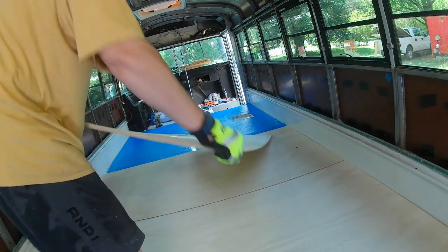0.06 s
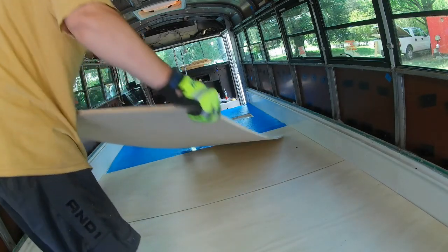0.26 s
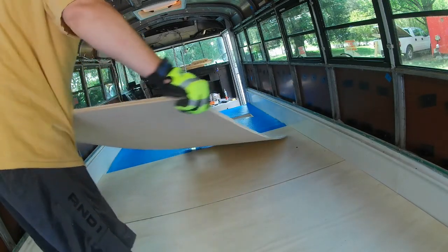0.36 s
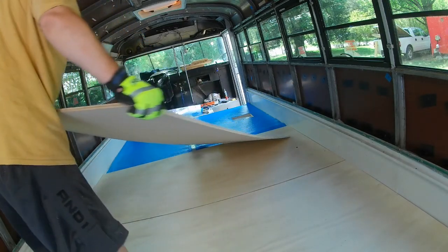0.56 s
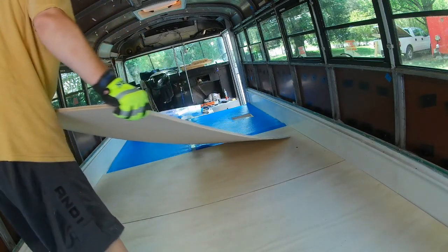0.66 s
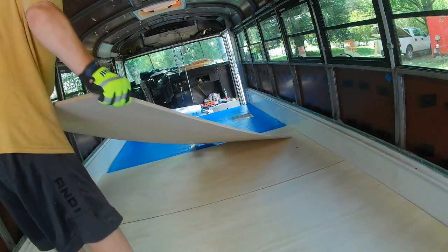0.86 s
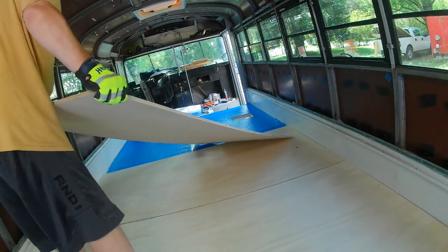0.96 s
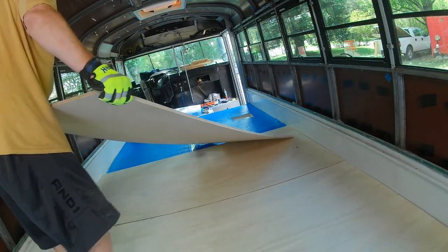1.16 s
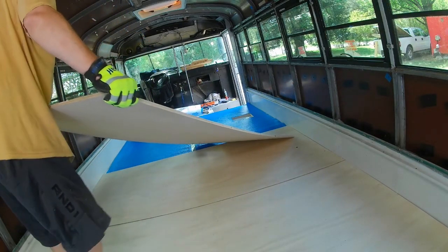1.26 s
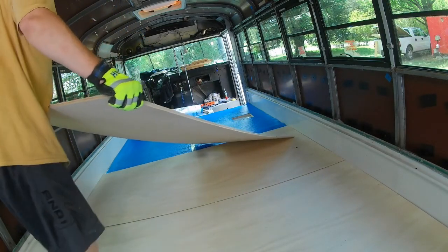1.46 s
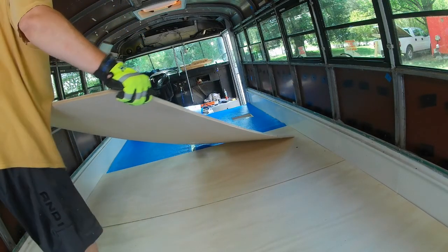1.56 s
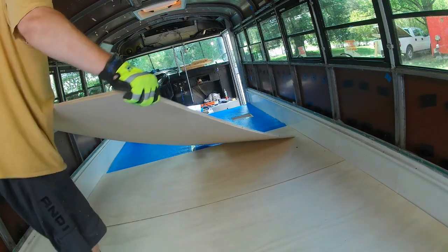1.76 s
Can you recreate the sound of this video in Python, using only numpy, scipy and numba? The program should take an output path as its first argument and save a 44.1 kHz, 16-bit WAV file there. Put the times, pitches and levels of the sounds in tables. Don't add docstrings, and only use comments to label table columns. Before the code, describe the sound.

Close mono pickup inside an empty bus: faint dry rubbing, one sharp clattering plywood slap with a short rising flex note and floor thump, then soft fibrous scraping, two brushing glove swipes and light hiss.

```python
import sys
import numpy as np
from scipy import signal
from scipy.fft import rfft, irfft
from scipy.io import wavfile
from scipy.ndimage import uniform_filter1d
from numba import njit

SR = 44100
rng = np.random.default_rng(int(sys.argv[2]) if len(sys.argv) > 2 else 0)


def file_out(sig):
    cols = np.atleast_2d(sig).T
    lim = np.clip(cols, -1, 1)
    pcm = np.round(lim * 32767).astype(np.int16)
    wavfile.write(sys.argv[1], SR, pcm)


def rack_gain(trim_db):
    fader = np.asarray(trim_db, float)
    return 10 ** (fader / 20)


N = 79380
SLAP_DB = -34


def level(x, db):
    return x * rack_gain(db) / np.sqrt(np.mean(x ** 2))


def filtered(x, order, hz, kind="low"):
    return signal.sosfilt(signal.butter(order, hz, kind, fs=SR, output="sos"), x)


@njit
def svf(x, hz, width):
    y, band, low = np.empty(len(x)), 0., 0.
    g, k = np.tan(np.pi * hz / SR), width / hz
    for i in range(len(x)):
        v = (band + g * (x[i] - low)) / (1 + g * (g + k))
        band, low, y[i] = 2 * v - band, low + 2 * g * v, k * v
    return y


@njit
def ring(x, hz, decay):
    y, z = np.empty(len(x)), 0j
    for i in range(len(x)):
        z = z * np.exp(2j * np.pi * hz[i] / SR - decay) + x[i] + 1e-18
        y[i] = z.imag
    return y


def mode(x, hz, t60):
    return ring(x, hz + np.zeros(N), np.log(1000) / (t60 * SR))


def walk(rate):
    hold = int(SR / rate)
    steps = np.repeat(rng.standard_normal(N // hold + 1), hold)
    return 1.67 * uniform_filter1d(uniform_filter1d(steps, hold), hold)[:N]


def pushes(rows):
    t = np.arange(N) / SR
    return sum(rack_gain(db) * np.exp(-((t - s) * 1000 / ms) ** 2 * 2) / ms for s, db, ms in rows)


def grit(bands):
    grains_per_s, spread_db, top_db, patchy_db = 9000, 2.5, 11, .7
    out = 0
    for hz, width, db in bands:
        u = rng.random((3, N))
        strength_db = np.minimum(-spread_db * np.log(u[2] + 1e-9), top_db)
        slips = (u[0] < grains_per_s / SR) * np.sign(u[1] - .5) * rack_gain(strength_db)
        band = svf(slips, 1. * hz, 1.57 * width)
        band = svf(band, 1. * hz, 1.57 * width)
        out = out + level(band, db) * rack_gain(patchy_db * walk(25.35))
    return out


def rubbing():
    # t/s, rubbing level/dB, fine dust level/dB, weight on the edge/dB
    pull = [(0, -51.5, 1, -1.5), (0.201, -53.5, 2, 1), (.222, -46.5, 0, 2.5), (0.263, -35.5, -7.5, 2),
            (0.274, -43, 0, 16.5), (0.308, -40.5, -3, 19), (.4, -47, -1.5, 7.5), (.5, -52.5, -1.5, -1),
            (.65, -56, 0, -0.5), (.77, -61, -1, -1.5), (.87, -48.5, -2, -3), (.97, -49.5, -1.5, 1.5),
            (1.07, -55.5, -1.5, -3), (1.11, -63, 2, 5), (1.3, -56, -3, 0), (1.41, -66, -1, 5.5),
            (1.599, -56, 0.5, -3.5), (1.8, -52, -1.5, 1.5)]
    # f/Hz, width/Hz, level/dB
    rasp = [(1727, 1470, -0.5), (3240, 1840, 2.5), (4900, 1460, -9.5)]
    dust = [(6380, 2940, -2), (8380, 2720, -1.5)]
    board = [(237, 68, -16), (402, 125, -12), (704, 323, -6), (1065, 330, -9.5)]
    shudder_db = .8
    s, db, dust_db, weight_db = np.array(pull, float).T

    def course(values):
        return np.interp(np.arange(N) / SR, s, values)

    mix = grit(rasp)
    mix = mix + rack_gain(course(dust_db)) * grit(dust)
    mix = mix + rack_gain(course(weight_db)) * grit(board)
    return mix * rack_gain(course(db) - 5.5 + shudder_db * walk(70))


def air():
    # f/Hz, level/dB per Hz
    spectrum = [(25, -27), (76, -14.5), (460, -4.5), (1000, -5.5), (3000, -12), (8500, -16.5), (11000, -18),
                (16000, -19)]
    hz = np.fft.rfftfreq(N, 1 / SR) + 1
    corner_hz, colour_db = np.array(spectrum).T
    colour = rack_gain(np.interp(np.log(hz), np.log(corner_hz), colour_db))
    low = 1 / (1 + (hz / 500) ** 2)

    def noise(share):
        return irfft(rfft(rng.standard_normal(N)) * colour * np.sqrt(share), N)

    bass, top = noise(low), noise(1 - low)
    return level(bass * rack_gain(1.3 * walk(5.87)) + top, -61)


def floor_boom():
    # t/s, f/Hz, level/dB, t60/s
    thuds = [(.255, 45, -66, .15), (.258, 96, -58, 0.34), (.31, 78, -60.5, 0.75), (0.363, 145, -64, 0.63),
             (1.08, 113, -67.5, 0.22), (1.04, 230, -66, 0.35), (1.7, 136, -71, 0.31), (.2, 204, -57, .15),
             (0.578, 210, -70.5, 0.55), (.2, 75, -69, 0.31)]
    rise_s = 0.013
    out = 0
    for s, hz, db, t60 in thuds:
        age = np.maximum(np.arange(N) / SR - s, 0)
        swell = 1 - np.exp(-(age / rise_s) ** 2)
        out = out + rack_gain(db + 2 - 60 * age / t60) * swell * np.sin(2 * np.pi * hz * age)
    return out


def slap():
    # t/s, strength/dB, contact length/ms
    contacts = [(.207, -16, .5), (.226, -14.5, 0.34), (.261, -22, .08), (.273, -2.5, 0.19),
                (.2835, -1, 0.33), (.2885, -3, 0.13), (.2945, -0.5, 0.33), (.2985, -3, 0.57),
                (.3075, -3.5, 0.21), (.316, -2.5, 0.52), (.326, -7, 0.46), (.337, -10, 0.14),
                (.353, -13, 0.26), (.368, -13.5, 0.16), (.385, -16, 0.21), (.402, -20, 0.15)]
    # f/Hz, level/dB, t60/s
    sheet = [(296, -6, 0.35), (359, -7.5, 0.15), (412, -17, 0.14), (555, -5, 0.44), (615.6, -0.5, 0.18),
             (683.6, -6.5, 0.18), (743, -4, 0.087), (905, -15, 0.39), (1051, -8.5, 0.19),
             (1137, -3.5, 0.24), (1445, -17, 0.32), (1593, -11.5, 0.11), (2050, -11, 0.076),
             (2748, -6, 0.14)]
    plate_db, plate_t60_s, plate_low_hz, plate_high_hz = 3.5, .14, 326, 2000
    force = pushes(contacts)
    force = np.diff(force, prepend=0) * 10 + force
    signs = np.sign(rng.standard_normal(len(sheet)))
    modes = sum(g * rack_gain(db) * mode(force, hz, t60) for g, (hz, db, t60) in zip(signs, sheet))

    t = np.arange(SR // 2) / SR
    tail = rng.standard_normal(SR // 2) * rack_gain(-60 * t / plate_t60_s)
    tail = filtered(tail, 3, plate_low_hz, "high")
    tail = filtered(tail, 2, plate_high_hz)
    plate = signal.fftconvolve(force, tail)[:N]

    def unit(x):
        return x / np.sqrt(np.mean(x[int(.28 * SR):int(.32 * SR)] ** 2))

    return rack_gain(SLAP_DB) * (unit(modes) + rack_gain(plate_db) * unit(plate))


def bending():
    # t/s, f/Hz
    bend = [(.27, 195), (.288, 230), (.39, 240), (.44, 265), (.49, 298)]
    # t/s, strength/dB, length/ms
    flexes = [
        (.272, -2, 0.33),
        (.478, -23, 1.),
    ]
    bend_db, t60_s = -1.5, 0.44
    pitch = np.interp(np.arange(N) / SR, *np.array(bend, float).T)
    note = mode(np.diff(pushes(flexes), prepend=0), pitch, t60_s)
    return rack_gain(SLAP_DB + bend_db + 1) * note / np.abs(note).max()


def glove():
    # start t/s, hold/s, level/dB, board level/dB
    swipes = [
        (1.009, 0.022, -49.5, -17),
        (1.15, 0.07, -47, -1),
    ]
    # f/Hz, width/Hz, level/dB
    fabric_bands = [(5800, 2600, -4), (8160, 2600, 0.5)]
    face_bands = [(680, 120, -13), (1000, 640, -7.5), (1520, 260, -6.5), (2950, 2000, -0.5)]
    attack_s, release_s, sag_db_per_s = 0.028, 0.037, -26.5
    t, hiss, face, out = np.arange(N) / SR, grit(fabric_bands), grit(face_bands), 0
    for s, hold, db, board_db in swipes:
        rise = np.clip((t - s) / attack_s, 0, 1)
        fall = np.exp(-(np.maximum(t - s - attack_s - hold, 0) / release_s) ** 2)
        gain = rack_gain(db - 3.5 + sag_db_per_s * np.maximum(t - s, 0))
        out = out + gain * rise * fall * (hiss + rack_gain(board_db) * face)
    return out


@njit
def walls(x, lags, gain, damp):
    line, soft, out = np.zeros((8, 4096)), np.zeros(8), np.zeros(len(x))
    for i in range(len(x)):
        total = 0.
        for k in range(8):
            soft[k] += (1 - damp) * (gain[k] * line[k, (i - lags[k]) & 4095] - soft[k])
            total += soft[k]
            out[i] += soft[k] * (1 - 2 * (k % 2))
        for k in range(8):
            line[k, i & 4095] = x[i] + soft[k] - total / 4
    return out


def cabin(near):
    cabin_db, t60_s, damp = -6, 0.34, 0.46
    lags = rng.integers(300, 1800, 8)
    return rack_gain(cabin_db - 10) * walls(near, lags, rack_gain(-60 * lags / SR / t60_s), damp)


def scene():
    near = rubbing() + glove() + slap()
    near = filtered(near, 2, 10080)
    mono = near + cabin(near) + bending() + floor_boom() + air()
    return np.array([mono, mono])


def roll_off(x):
    return signal.sosfilt(signal.butter(12, 16270, fs=SR, output="sos"), x)


def record(dry):
    x = filtered(dry, 2, 45, "high")
    x = signal.sosfilt(signal.ellip(10, .2, 60, 15750, fs=SR, output="sos"), x)
    return roll_off(x)


dry = scene()
out = record(dry)
file_out(out)
```